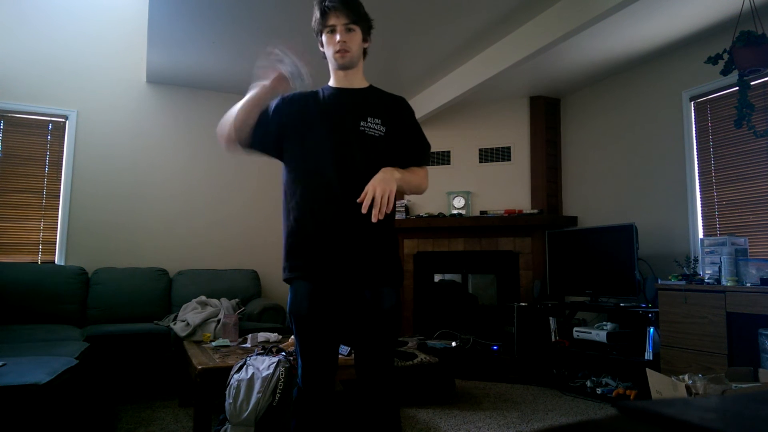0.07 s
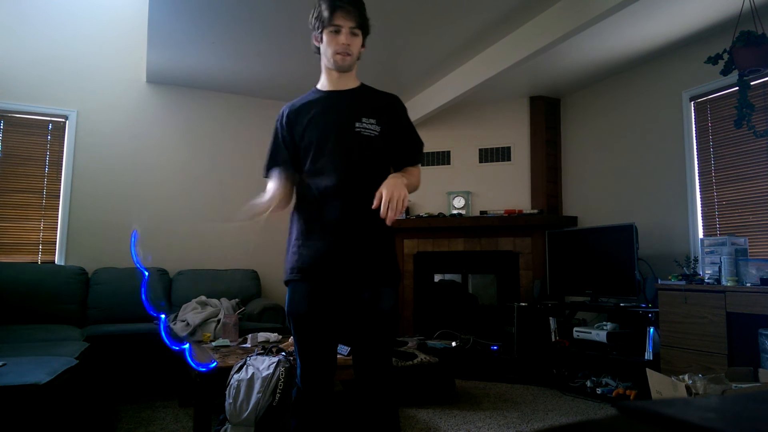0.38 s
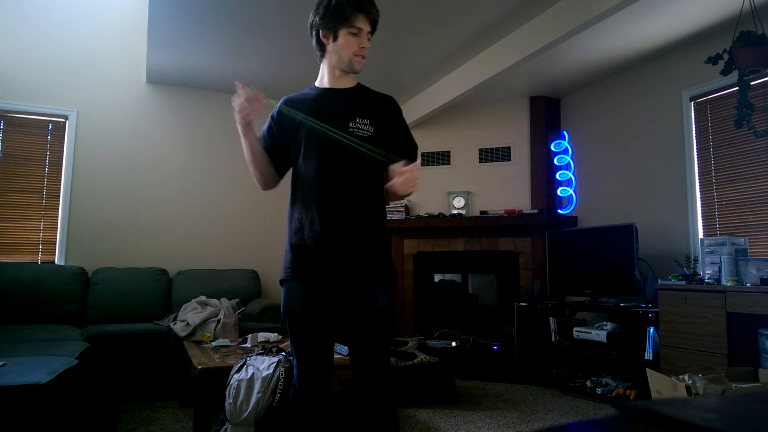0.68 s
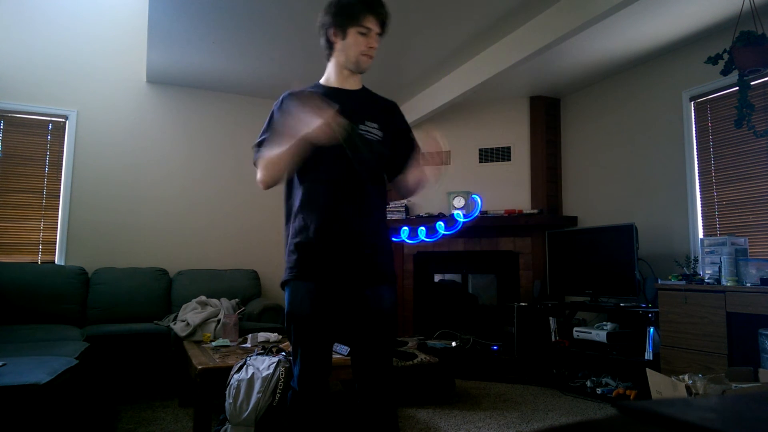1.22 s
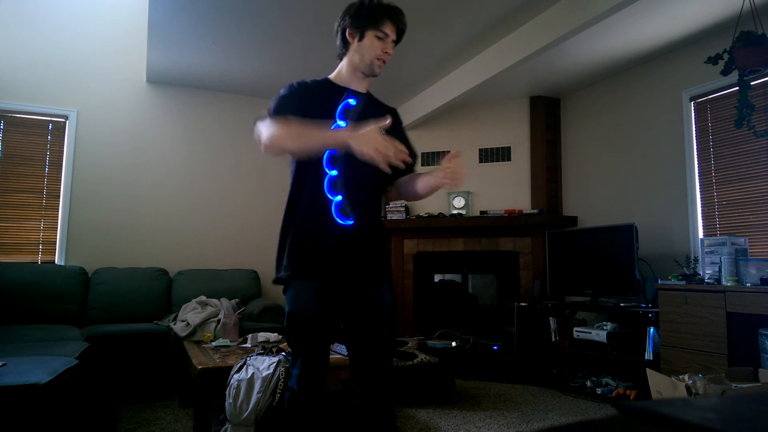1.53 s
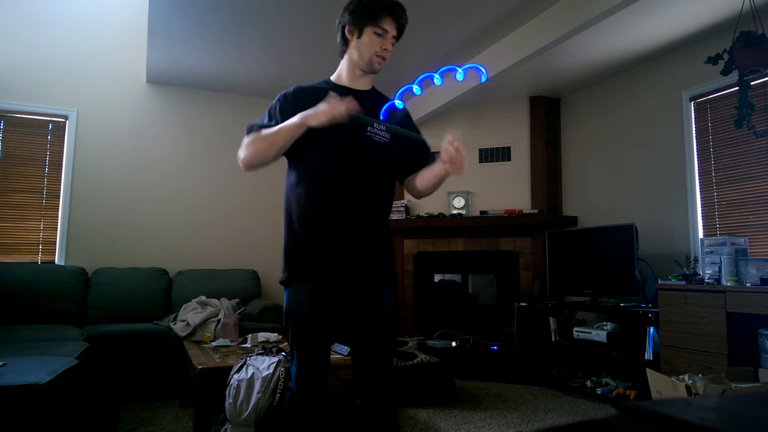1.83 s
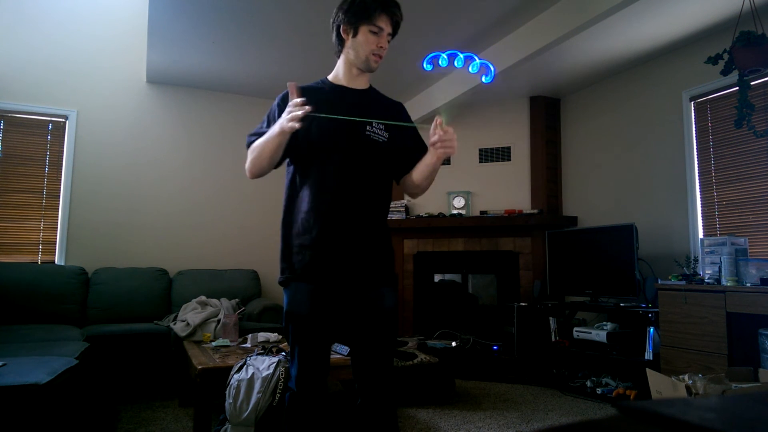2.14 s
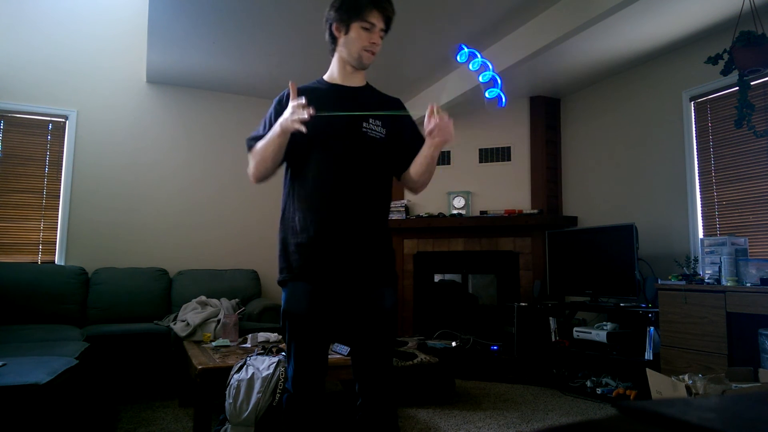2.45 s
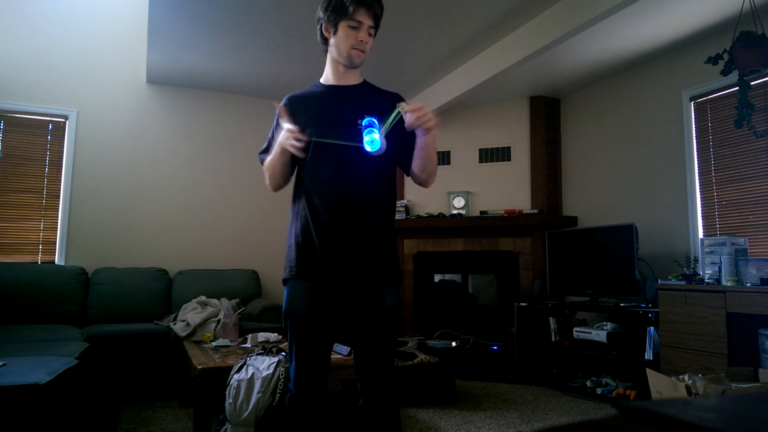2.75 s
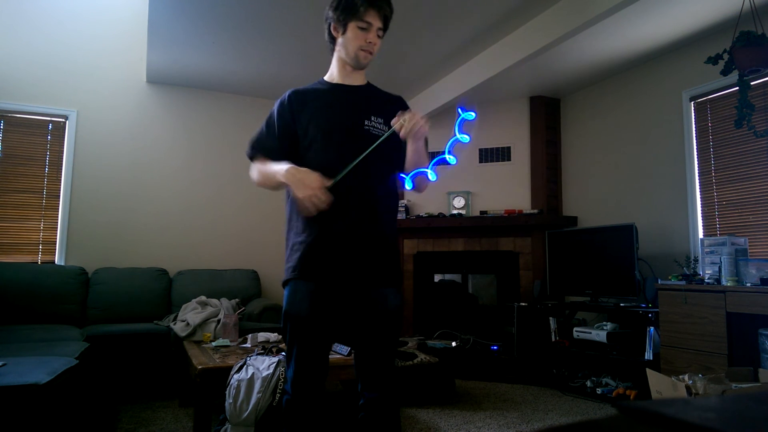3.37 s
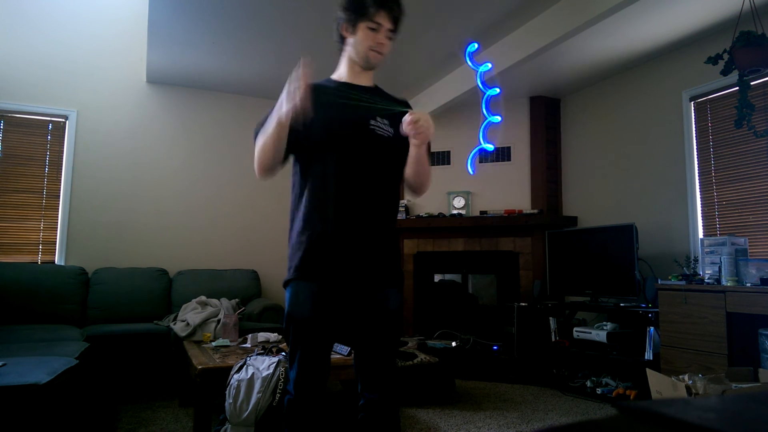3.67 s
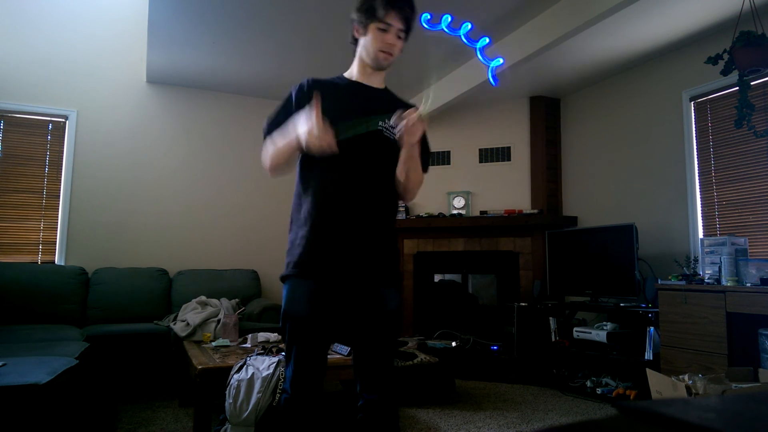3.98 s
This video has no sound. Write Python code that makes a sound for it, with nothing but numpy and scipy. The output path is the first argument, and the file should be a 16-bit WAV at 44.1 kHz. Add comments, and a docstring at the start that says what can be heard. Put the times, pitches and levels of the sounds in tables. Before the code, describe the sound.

A yo-yo is thrown about half a second in and spins on to the end at 4 seconds, its bearing rattling and hissing brightly. The string whirs, swelling and gliding with the swings, and sings briefly near 1.3 seconds. Hard jolts knock at about 2.1 and 3.1 seconds. The yo-yo sounds duller on the right. Sleeves rustle softly over a quiet living room's faint rumble and hum.

```python
"""A ball-bearing yo-yo, thrown once, keeps spinning as it is swung around on its string.
The bearing rattles the ringing shells, with a few hard jolts, under a hiss and sizzle that pulse once
per turn. The string whirrs against the rims, swelling and gliding with the swings, and once sings briefly.
Sleeves rustle; the quiet living room rumbles and hums faintly. The yo-yo sounds duller on the right."""
import sys
import numpy as np
from scipy import signal
from scipy.fft import rfft, irfft, next_fast_len
from scipy.io import wavfile
from scipy.ndimage import uniform_filter1d, map_coordinates

SR = 44100
rng = np.random.default_rng(int(sys.argv[2]) if len(sys.argv) > 2 else 0)


def unload_wav(signal):
    """Save mono or channel-first audio to the path in sys.argv[1] as 16-bit WAV at rate SR, clipped to [-1, 1]."""
    wavfile.write(
        sys.argv[1],
        SR,
        np.round(np.clip(np.atleast_2d(signal).T, -1, 1) * 32767).astype(np.int16),
    )


N = 176400

# Fader rides through the swings: t/s, then level/dB before each layer's trim for
# main shell ring, lower shell modes, string whirr, bearing hiss, top sizzle
SWING_FADERS = [(0.25, -83, -87, -93, -82.5, -99), (0.44, -69.5, -73.5, -88, -72.5, -73),
                (0.47, -62, -59, -73, -66.5, -72), (0.55, -69, -75, -75, -62, -70.5),
                (0.6, -50, -53, -64, -55, -54), (0.65, -44.5, -55, -59.5, -51.5, -59),
                (0.71, -57, -48.5, -62.5, -54.5, -57), (0.75, -46.5, -49, -60.5, -51.5, -52.5),
                (0.88, -51.5, -54.5, -57.5, -50, -55.5), (1.06, -54.5, -64.5, -74, -54.5, -68),
                (1.2, -53.5, -58.5, -65.5, -49.5, -59), (1.25, -58.5, -66, -72, -53.5, -62),
                (1.3, -47, -45.5, -57, -51.5, -51), (1.31, -52, -55, -59, -53.5, -58.5),
                (1.41, -46.5, -50.5, -57, -51, -53.5), (1.47, -49.5, -55, -60, -52, -62.5),
                (1.57, -44, -44.5, -56, -51, -52), (1.64, -46.5, -47, -60, -51.5, -54),
                (1.75, -45, -52, -59, -42.5, -41), (1.81, -41.5, -43.5, -54.5, -47, -46.5),
                (1.88, -58, -62, -57.5, -52.5, -61.5), (1.91, -51, -51, -56, -43, -55.5),
                (1.97, -43, -45, -60.5, -46, -51.5), (2.06, -44, -54, -51.5, -43.5, -54.5),
                (2.08, -49, -43.5, -55, -48.5, -49.5), (2.12, -38.5, -55, -51.5, -47, -52),
                (2.19, -39.5, -45, -54, -42.5, -53), (2.23, -40, -48.5, -57, -46, -55),
                (2.35, -37, -52, -59, -46, -51), (2.41, -40.5, -51, -55.5, -42, -51.5),
                (2.44, -44, -49.5, -57.5, -51, -53), (2.56, -46.5, -53, -57, -52.5, -60),
                (2.65, -48, -51, -71.5, -49, -58.5), (2.78, -46, -48, -62.5, -49, -52.5),
                (2.82, -57, -62, -65, -54, -64.5), (2.9, -48, -46.5, -56.5, -50, -53.5),
                (2.92, -50.5, -59, -65, -50.5, -59.5), (3.1, -39, -47.5, -56.5, -47, -53.5),
                (3.17, -40, -47.5, -56, -49.5, -51), (3.23, -56.5, -61, -57.5, -53, -63),
                (3.27, -55, -66, -66, -59.5, -61), (3.36, -46.5, -52, -58, -47.5, -60),
                (3.48, -42.5, -49, -52.5, -51.5, -53.5), (3.52, -41.5, -42, -57, -46.5, -50.5),
                (3.57, -51, -53.5, -56.5, -52, -56), (3.61, -57.5, -61, -65, -56, -63.5),
                (3.74, -56, -69, -65, -55, -70), (3.82, -47.5, -61, -55, -53, -54),
                (3.87, -42, -45.5, -56, -47, -52), (4.0, -63, -75, -66, -58, -68.5)]
# Shell resonances, two lower modes then the close pair of the main ring: f/Hz, width/Hz, level/dB
SHELL_MODES = [(2592, 144, 0), (2990, 233, 2.5), (3391, 290, -1.5), (3562, 255, 0)]
# Jolts of the yo-yo on the string: t/s, level/dB
JOLT_HITS = [(2.121, -25.5), (2.128, -25.5), (2.143, -30), (3.085, -38), (3.089, -23.5), (3.124, -29)]
# Tone of the bearing's hiss: f/Hz, level/dB
HISS_EQ = [(1500, -68), (2800, -48), (3800, -4.5), (4300, -3), (5000, -1.5), (5700, 5), (6050, 3.5),
           (6550, 6), (7100, 1.5), (8000, -7.5), (9500, -18), (12000, -35)]
# Tone of the bright sizzle on top: f/Hz, level/dB
SIZZLE_EQ = [(1000, -47), (2500, 2), (4200, -16.5), (7500, 5.5), (9000, -0.5), (10200, 0.5), (10900, 6),
             (11700, 10.5), (12600, 10), (14000, 2.5), (15700, 1.5)]
# Tone of the string rubbing the rims: f/Hz, level/dB
RUB_EQ = [(300, -50), (900, -32.5), (1320, -17), (1520, -3.5), (1800, -4), (2080, 3), (2460, 1.5),
          (2750, -10.5), (3300, -8.5), (4250, -3.5), (5500, -28), (9000, -65)]
# Centre of the whirr as the swings tighten and slacken the string: t/s, f/Hz
WHIRR_GLIDE = [(.6, 1750), (.76, 3027), (.93, 1750), (1.26, 1650), (1.31, 2500), (1.35, 1628), (1.43, 1473),
               (1.55, 2607), (1.68, 3200), (1.85, 1605), (1.99, 2924), (2.13, 1949), (2.3, 1623),
               (2.4, 1970), (2.52, 1587), (2.62, 2198), (2.75, 2910), (2.88, 2345), (3.0, 2830),
               (3.22, 1620), (3.37, 2565), (3.49, 2150), (3.57, 1642), (3.79, 1957), (3.87, 3100),
               (3.97, 1750)]
# Low cut, as the small rims radiate little bass: f/Hz, level/dB
RIM_EQ = [(1200, -25), (1400, -12), (1530, 3)]
# Fader ride of the sleeve and string rustle, before its trim: t/s, level/dB
RUSTLE_FADER = [(.3, -86.5), (.43, -76), (.47, -65), (.51, -70), (.56, -81), (.6, -62.5), (.68, -70.5),
                (.85, -70.5), (1.08, -75), (1.4, -69.5), (1.66, -68.5), (1.77, -64), (1.87, -71.5),
                (2.18, -65.5), (2.35, -71), (2.7, -65.5), (2.95, -70), (3.08, -63.5), (3.17, -62.5),
                (3.25, -73), (3.38, -70), (3.52, -68), (3.66, -76.5), (4, -68.5)]
# Tone of the rustle: f/Hz, level/dB
RUSTLE_EQ = [(60, -12), (150, -5), (260, -5), (350, -2), (480, -3), (650, -5.5), (890, -2), (1150, -2),
             (1600, 4.5), (3000, -2)]
# Shading of the right channel against the left: f/Hz, level/dB
RIGHT_EQ = [(700, 0.5), (1200, -3), (1800, -8.5), (2250, -10), (2600, -3), (3550, -5), (4200, -5),
            (5200, -19), (6400, -24), (10000, -23), (15000, -18)]
# Fader ride of the deep room rumble: t/s, level/dB
RUMBLE_FADER = [(0, -78), (.45, -69.5), (1.1, -73), (1.6, -66), (2.6, -68), (3.5, -68.5), (4, -72)]
# Tone of the rumble: f/Hz, level/dB
RUMBLE_EQ = [(20, 5), (35, -3.5), (45, -12.5), (56, -2.5), (80, -17), (130, -27), (400, -31), (2000, -96)]
# Tone of the room air: f/Hz, level/dB
AIR_EQ = [(20, -9), (85, -5.5), (180, -11.5), (400, -14), (800, -14), (1500, -13), (3000, -16), (4000, -16),
          (4800, -26), (8000, -27), (15500, -30)]

THROW_S, SPIN_HZ, SPIN_LOSS_PER_S = .5, 135.7, .047  # turns a second at the throw, and their decay
UNWIND_S, UNWIND_DB_PER_S = 0.28, 155  # fade-in while the string unwinds
ZING_S, ZING_LENGTH_S, ZING_HZ, ZING_SAG_HZ_PER_S, ZING_DB = 1.32, 0.14, 1596, 450, -57.5
EARLY_T60_S, LATE_T60_S, LATE_DB = 0.006, 0.32, 2.5  # close reflections, and the room's tail
AIR_DB, HUM_HZ, HUM_DB = -74.5, 448, -89
TOP_HZ = 15790


def rattle(ring_db, lower_db):
    """The bearing chatters and rings the shells; the lower modes come and go with the swings."""
    chatter = room(contacts(per_s=750, scatter_db=0) * turning(depth=0.2))
    lower = unit_pair(shells(chatter, SHELL_MODES[:2]))
    main = unit_pair(shells(chatter, SHELL_MODES[2:]))
    return amp(ring_db) * main + amp(lower_db - 0.5) * lower


def shells(x, modes):
    """The yo-yo's two halves ring as steep-sided resonances of alternating polarity."""
    def response(hz):
        bands = [amp(db) * (1j * hz * width / (centre ** 2 - hz ** 2 + 1j * hz * width)) ** 2
                 for centre, width, db in modes]
        return sum((-1) ** k * band for k, band in enumerate(bands))
    return filtered(x, response)


def contacts(per_s, scatter_db):
    """A crackle of tiny random impacts, their sizes spread by scatter_db; rms 1."""
    hits = rng.random(N) < per_s / SR
    polarity = np.sign(rng.standard_normal(N))
    size = amp(scatter_db * np.clip(rng.standard_normal(N), -2, 2))
    return unit(hits * polarity * size)


def turning(depth):
    """Contact pressure rises once per turn of the slowing yo-yo: a fast tremolo."""
    spin_hz = SPIN_HZ * np.exp(-SPIN_LOSS_PER_S * (np.arange(N) / SR - THROW_S))
    return 1 + depth * np.sin(2 * np.pi * np.cumsum(spin_hz) / SR)


def jolts():
    """Jolts on the string knock the shells: hard, dry accents, left of centre."""
    blows = np.zeros(N)
    for s, db in JOLT_HITS:
        blows[round(s * SR)] = amp(db)
    ring = shells(np.array([blows, amp(-7) * blows]), SHELL_MODES[2:])
    return ring * blows.max() / np.abs(ring).max()


def bearing(hiss_db, sizzle_db):
    """Dense rolling contacts pulse with the spin: a hiss and a sizzle above it, fluttering together."""
    flutter = turning(depth=0.12) * amp(wobble(40))
    coarse = room(contacts(per_s=1900, scatter_db=4))
    hiss = unit_pair(shifting_reflections(eq(coarse, HISS_EQ), patchy_db=3))
    fine = room(contacts(per_s=2300, scatter_db=0))
    sizzle = unit_pair(shifting_reflections(eq(fine, SIZZLE_EQ), patchy_db=2))
    return flutter * (amp(hiss_db + 1.17) * hiss + amp(sizzle_db + 1) * sizzle)


def whirr(level_db):
    """The string rubs on the rims: a rough band with a gliding, wavering peak."""
    centre_hz, = automation(WHIRR_GLIDE)
    half_width_hz = 140
    slips = contacts(per_s=2100, scatter_db=-2) * turning(depth=0.14)
    # Low-passed slip noise, shifted up to ride the glide.
    narrow = filtered(np.array([room(slips), room(slips)]), lambda hz: 1 / (1 + (hz / half_width_hz) ** 4))
    phase = 2 * np.pi * np.cumsum(centre_hz * (1 + .02 * wobble(70))) / SR
    left, right = narrow[0] * np.cos(phase) + narrow[1] * np.sin(phase)
    glide = unit_pair(eq(shade_right(left, right), RIM_EQ))
    rub = unit_pair(shifting_reflections(eq(room(slips), RUB_EQ), patchy_db=4.5))
    return amp(level_db) * (amp(1.5) * rub + amp(-7) * glide)


def zing():
    """For a moment the string sings on one slightly sagging note."""
    t = np.arange(N) / SR - ZING_S
    swell = np.sqrt(np.abs(np.sin(np.pi * np.clip(t / ZING_LENGTH_S, 0, 1))))
    phase = 2 * np.pi * np.cumsum(ZING_HZ - ZING_SAG_HZ_PER_S * t) / SR
    left, right = [amp(ZING_DB + 2 * wobble(68)) * swell * np.sin(phase + 0.39 * wobble(90))
                   for _ in range(2)]
    return shade_right(left, right)


def rustle():
    """Sleeves and string brush softly as the hands move."""
    level_db, = automation(RUSTLE_FADER)
    cloth = eq(room(rng.standard_normal(N)), RUSTLE_EQ)
    return amp(level_db + 4) * unit_pair(cloth)


def room(x):
    """Each contact gets its own diffuse reflections: stereo noise that follows its decaying energy."""
    t = np.arange(SR // 3) / SR
    early, late = amp(-60 * t / EARLY_T60_S) ** 2, amp(-60 * t / LATE_T60_S) ** 2
    decay = early / early.sum() + amp(LATE_DB) ** 2 * late / late.sum()
    power = signal.fftconvolve(x ** 2, decay)[:N]
    reflections = np.sqrt(np.abs(power)) * rng.standard_normal((2, N))
    left, right = reflections + amp(-6.5) * x
    return shade_right(left, right)


def shifting_reflections(pair, patchy_db):
    """Reflections add and cancel as the yo-yo flies about: random, shifting peaks and dips in the tone."""
    spectra = signal.stft(pair, nperseg=1024)[2]
    patches = uniform_filter1d(rng.standard_normal(spectra.shape), size=4, axis=1)  # across frequency
    patches = uniform_filter1d(patches, size=5, axis=2)  # across time
    return signal.istft(spectra * amp(patchy_db * unit(patches)), nperseg=1024)[1][:, :N]


def room_tone():
    """The bed: faint air, a wavering hum and a deep, nearly mono rumble."""
    rumble_db, = automation(RUMBLE_FADER)
    rumble = unit(eq(rng.standard_normal(N) + 0.38 * rng.standard_normal((2, N)), RUMBLE_EQ))
    air = unit(eq(rng.standard_normal((2, N)) + .5 * rng.standard_normal(N), AIR_EQ))
    hum = np.sqrt(2) * np.sin(2 * np.pi * HUM_HZ * np.arange(N) / SR + 0.54 * wobble(12))
    return amp(rumble_db) * rumble + amp(AIR_DB) * air + amp(HUM_DB) * hum


def amp(db):
    """Decibels to gain."""
    return 10 ** (np.asarray(db) / 20)


def unit(x):
    """Scale to rms 1."""
    return x / np.sqrt(np.mean(x ** 2) + 1e-20)


def unit_pair(pair):
    """Scale a stereo pair so that its mono fold-down has rms 1."""
    return pair / np.sqrt(np.mean(pair.mean(0) ** 2) + 1e-20)


def automation(rows):
    """One lane of straight ramps for each column after the time."""
    times, *lanes = np.transpose(rows)
    return [np.interp(np.arange(N) / SR, times, lane) for lane in lanes]


def wobble(per_s):
    """A smooth random modulator with per_s knots a second."""
    knots = rng.standard_normal(int(N * per_s / SR) + 4)
    return map_coordinates(knots, [np.arange(N) * per_s / SR])


def filtered(x, response):
    """Filter x by a gain given as a function of frequency."""
    size = next_fast_len(N + SR // 2)
    return irfft(rfft(x, size) * response(np.fft.rfftfreq(size, 1 / SR)), size)[..., :N]


def eq(x, points):
    """Shape x by points of f/Hz, level/dB, joined on a log frequency axis."""
    point_hz, point_db = np.transpose(points)
    return filtered(x, lambda hz: amp(np.interp(np.log(hz + 1), np.log(point_hz + 1), point_db)))


def shade_right(left, right):
    """A stereo pair with little treble on the right."""
    return np.array([left, eq(right, RIGHT_EQ)])


def scene():
    """The spinning yo-yo and the rustle fade in over the room tone."""
    ring_db, lower_db, whirr_db, hiss_db, sizzle_db = automation(SWING_FADERS)
    unwinding = amp(UNWIND_DB_PER_S * np.minimum(np.arange(N) / SR - UNWIND_S, 0))
    yoyo = rattle(ring_db, lower_db) + jolts() + whirr(whirr_db) + zing() + bearing(hiss_db, sizzle_db)
    return unwinding * (yoyo + rustle()) + room_tone()


def record(dry):
    """A brick-wall high cut on the whole mix."""
    return filtered(dry, lambda hz: hz < TOP_HZ)


dry = scene()
out = record(dry)
unload_wav(out)
```